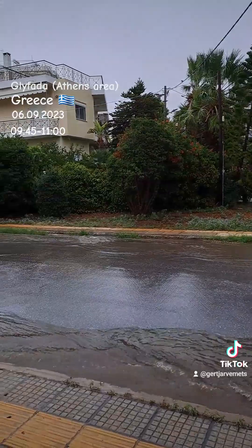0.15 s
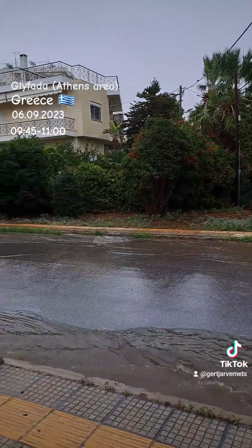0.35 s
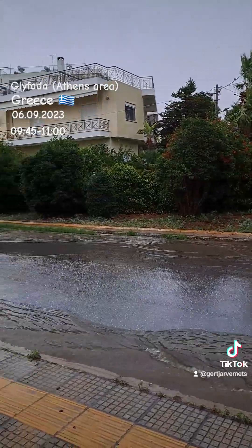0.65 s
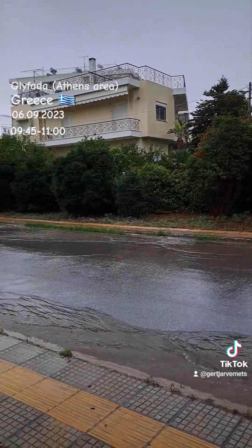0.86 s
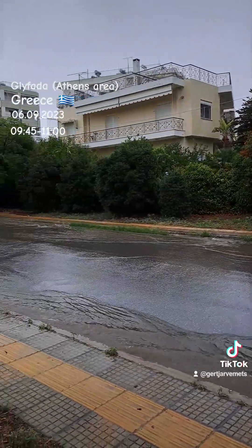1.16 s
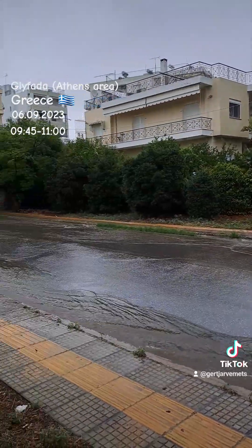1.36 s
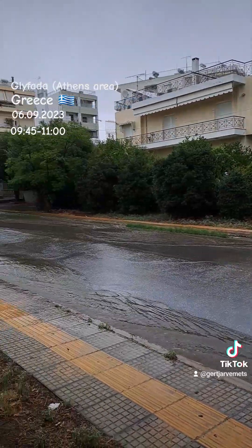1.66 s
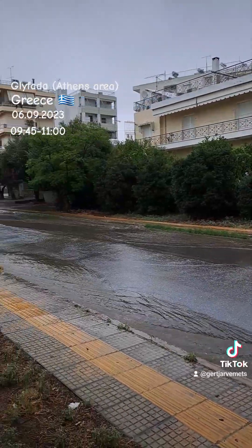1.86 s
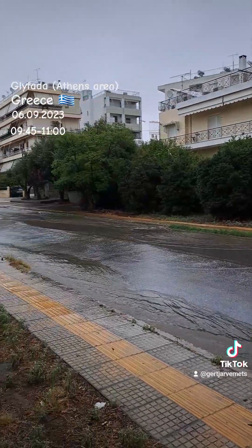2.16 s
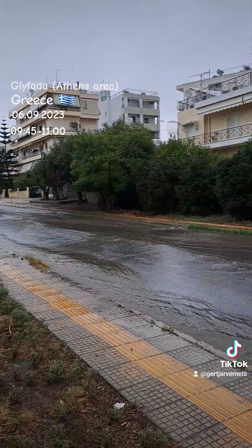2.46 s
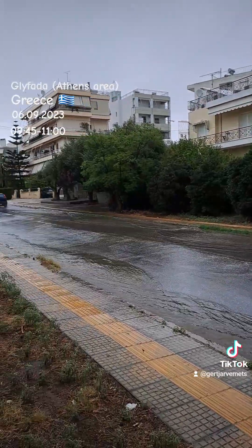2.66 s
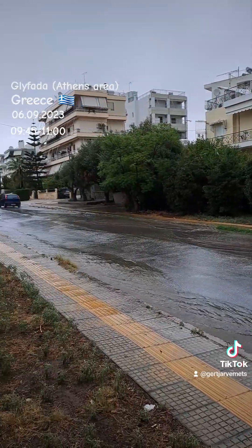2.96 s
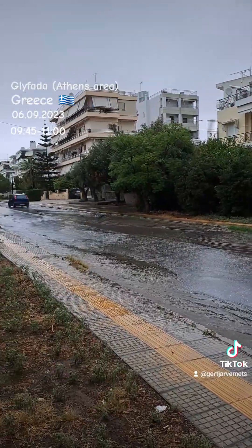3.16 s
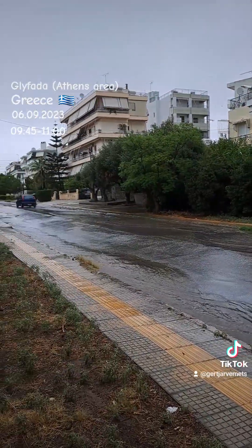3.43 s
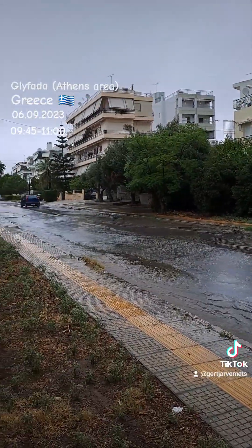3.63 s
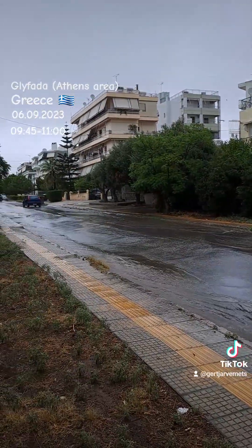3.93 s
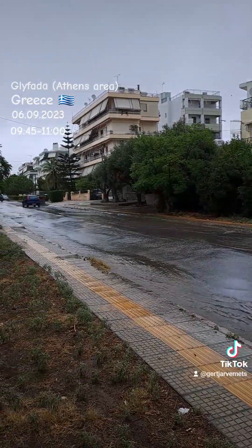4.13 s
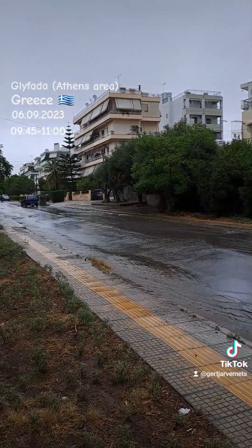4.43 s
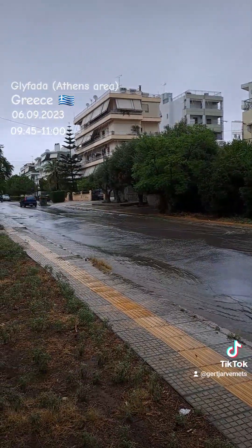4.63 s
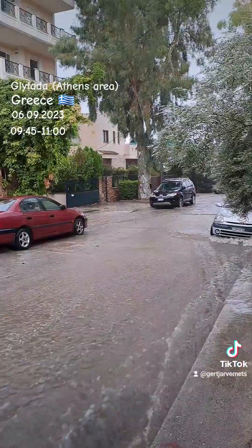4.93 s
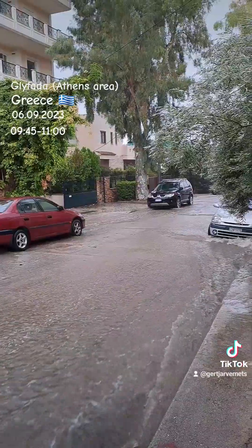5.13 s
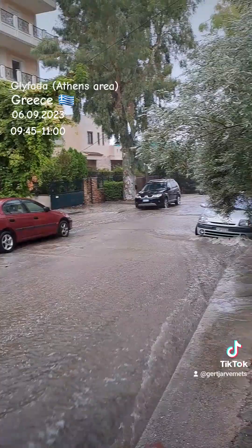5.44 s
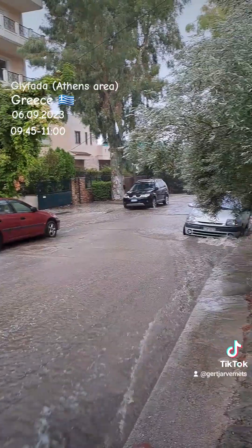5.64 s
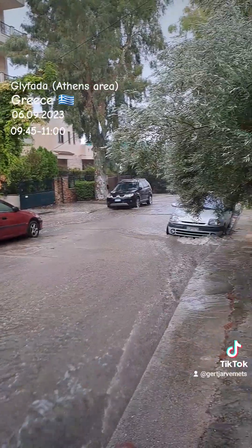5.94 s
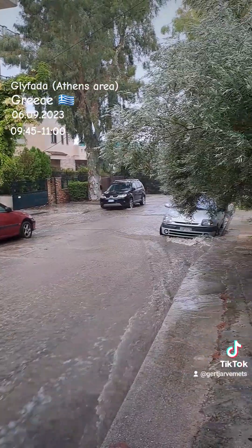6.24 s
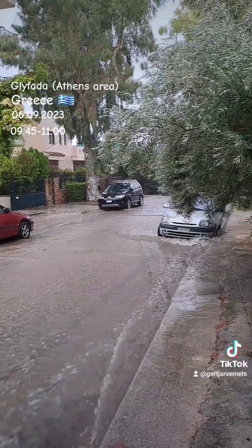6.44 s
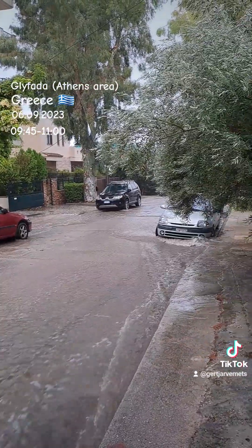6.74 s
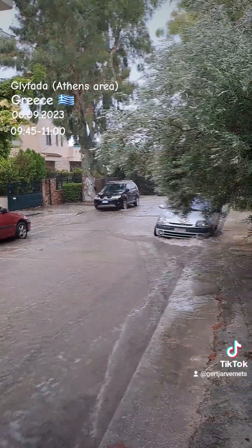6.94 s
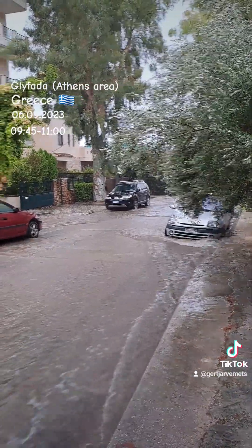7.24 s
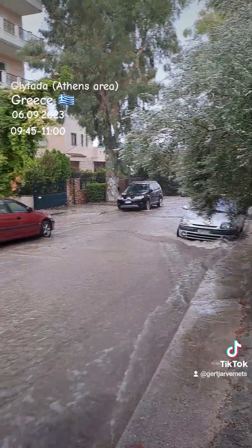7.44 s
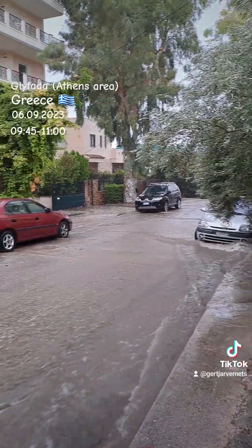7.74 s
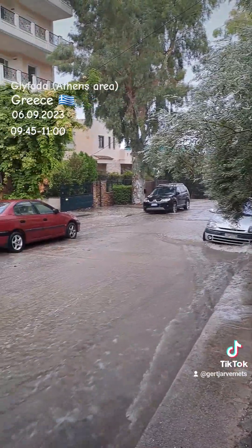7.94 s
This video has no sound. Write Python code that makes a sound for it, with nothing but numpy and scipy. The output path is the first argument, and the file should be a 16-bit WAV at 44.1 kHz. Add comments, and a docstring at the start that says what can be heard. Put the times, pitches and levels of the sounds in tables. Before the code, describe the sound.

A muffled, ringing rush of street water softens slightly as the phone turns away, with small gurgles and deep traffic rumble below. After a tiny gap, a second street bursts in: near floodwater churning with spray, glugs and plips, crisp drops hitting the right side of the microphone, and a car's low hum and exhaust booms barely carrying through the water.

```python
"""Two rainy streets, one cut: storm runoff heard through a hand-held phone with rain in its microphone ports.
On the road, bubbles and noise make a sheet of water; wet-port filters leave it hollow left, nasal right.
In the lane, a close torrent adds bright spray, large bubbles and slops, while a car's low sines idle and boom.
Raindrops ring the right port or plink in the water; rumble sits under both streets, far traffic on the road."""
import sys
import numpy as np
from scipy import signal
from scipy.fft import rfft, irfft, next_fast_len
from scipy.io import wavfile
from scipy.ndimage import uniform_filter1d, map_coordinates

SR = 44100
rng = np.random.default_rng(int(sys.argv[2]) if len(sys.argv) > 2 else 0)


def put_to_file(sound):
    """Save the sound as 16-bit audio at rate SR, in the file named by the first command-line argument."""
    columns = np.atleast_2d(sound).T  # one column per channel
    safe = np.clip(columns, -1, 1)
    whole_steps = np.round(safe * 32767)
    wavfile.write(sys.argv[1], SR, whole_steps.astype(np.int16))


N = 356769
TIME = np.arange(N) / SR
SIZE = next_fast_len(N, real=True)
FREQ = np.maximum(np.arange(SIZE // 2 + 1) * SR / SIZE, 1)

ROAD_END_S, LANE_START_S = 4.912, 4.937
SOAK_S = 4.221  # a drop settles in the right port
CUTOFF_HZ = 15600
LANE_RUMBLE_DB = -33.5
SLOP_ATTACK_SHARE = 0.6  # attack spread as a share of the fade spread
FIRING_HZ, FIRING_DB, FIRING_FADE_DB_PER_S = 45.8, -34, 3  # level at the start of the lane
DRONE_HZ, DRONE_DB, DRONE_FADE_DB_PER_S = 197.4, -40, 2  # level at the start of the lane
IDLE_END_S, IDLE_RELEASE_S = 6.6, 0.15
HUM_RISE_PER_S = 0.05  # exponential pitch rise, share per second
PATTER_PER_S, PATTER_DB, PATTER_SPREAD_DB, PATTER_HZ = 34, -19, 3.3, 12700  # level of the softest
SPLATTER_DB, SPLATTER_S = -18, 0.0005  # level against the hit

# Every "spread" below is the standard deviation of a bell-shaped rise and fall, in time or octaves.
# Spectrum levels are relative: trims and level curves follow.

# Colour of the rush through the left port: (frequency [Hz], level per Hz [dB])
LEFT_PORT_COLOUR = [(170.0, -60.5), (260.0, -59.3), (340, -60), (470.0, -63.8), (850.0, -54.6),
                    (960.0, -50.8), (1085.0, -45.4), (1220.0, -51.2), (1380.0, -58.3), (2000.0, -72.5),
                    (3000.0, -85.4), (4000.0, -105.7), (6500.0, -121.0), (11000.0, -109.7),
                    (15000.0, -117.1)]
# Colour of the rush through the right port: (frequency [Hz], level per Hz [dB])
RIGHT_PORT_COLOUR = [(170.0, -63), (260.0, -57.5), (345, -60.5), (500.0, -64.5), (680.0, -64),
                     (800.0, -62.5), (1250.0, -63.5), (1550.0, -58), (2800.0, -61.5), (3600.0, -57),
                     (4400.0, -69.5), (6400.0, -88.5), (8500.0, -80.5), (10200.0, -77), (13500.0, -100),
                     (15000.0, -104)]
# Colour of the right port once a drop has settled in it: (frequency [Hz], level per Hz [dB])
SOAKED_PORT_COLOUR = [(170.0, -60.7), (480.0, -65.6), (1250.0, -66.2), (1500.0, -62.6), (2300.0, -66.9),
                      (3100.0, -71.8), (3600.0, -70.3), (4450.0, -69.5), (4830.0, -66.3), (5370.0, -80.5),
                      (6600.0, -89.2), (9700.0, -81.9), (11100.0, -73.7), (14000.0, -96.5)]
# Colour of the torrent: (frequency [Hz], left level per Hz [dB], right level per Hz [dB])
TORRENT_COLOUR = [(150.0, -58, -57), (198, -55.5, -55), (290, -55, -54.5), (453, -56, -58.5),
                  (700.0, -53.5, -54.5), (1100.0, -56.5, -57), (1580, -56.5, -55), (2930, -61.5, -62.5),
                  (5760, -63, -64), (7270, -73, -72), (10060, -74.5, -70.5), (12030, -74, -60),
                  (14900, -82, -63.5), (15600.0, -88, -71)]
# How alike the ports hear the road: (frequency [Hz], likeness [0-1], lead of the left [rad])
ROAD_PORT_LIKENESS = [(50.0, 0.97, -0.5), (250.0, 0.99, -0.1), (480.0, 0.83, -0.0), (720.0, 0.9, -0.2),
                      (980.0, 0.69, -0.5), (1200.0, 0.53, -1.9), (1420.0, 0.53, -2.9), (1900.0, 0.45, -1.8),
                      (3000.0, 0.39, -1.8), (4000.0, 0.07, -0.5)]
# How alike the ports hear the lane: (frequency [Hz], likeness [0-1], lead of the left [rad])
LANE_PORT_LIKENESS = [(50.0, 0.98, -0.4), (130.0, 0.88, -0.2), (250.0, 0.96, -0.1), (450.0, 0.68, -0.4),
                      (750.0, 0.65, -0.8), (1050.0, 0.18, -1.1), (1700.0, 0.21, 1.3), (2450.0, 0.31, 0.1),
                      (3100.0, 0.02, -3.1)]
# Level of the runoff as the phone turns up the road, before shading: (time [s], level [dB])
FACING_LEVEL = [(0, 2), (1.9, 1), (2.8, -2), (4.9, -3.5)]
# Lift or dip of the nearest ripples' hiss band: (time [s], level [dB])
RIPPLE_HISS_LEVEL = [(0, 4.5), (2.2, -1), (3.6, 1.5), (4.3, 1.5)]
# Close reflection, sliding later overall as the phone turns: (time [s], delay [ms], strength [share])
CLOSE_ECHO = [(0, 1.1, 0.18), (.5, 1.08, 0.24), (1.15, 1.2, 0.18), (2.2, 1.33, 0.16), (3.4, 1.33, 0.1),
              (4.9, 1.5, .15)]
# Gurgles in the wet ports, as lifts or dips of a band:
# (time [s], spread [s], centre [Hz], spread [octaves], left change [dB], right change [dB])
PORT_GURGLES = [(.27, .1, 910, 0.15, 3, 5), (0.787, 0.096, 1020, 0.12, 2.5, 5),
                (0.817, 0.025, 3380, .15, 0, 3), (1.29, 0.027, 1100, .12, 3, 4),
                (1.45, 0.045, 1080, .15, -5.5, 0), (1.7, 0.12, 1110, 0.098, 2.5, 2),
                (1.805, 0.22, 3300, 0.082, 0, 1), (2.19, 0.18, 1080, 0.11, 2.5, 3),
                (2.16, 0.11, 1560, .08, 5, 3), (2.792, .05, 1080, .15, -4, -1),
                (3.01, 0.06, 1190, 0.09, 4.5, 0), (3.26, 0.12, 1060, 0.061, 3.5, 2),
                (3.53, 0.019, 3500, .2, 0, 3), (3.75, 0.016, 1080, 0.22, -6, 0),
                (4.05, .13, 3300, 0.2, 0, -1.5)]
# Slow surges and a lull of the torrent: (time [s], spread [s], body change [dB], spray change [dB])
TORRENT_SURGES = [(5.7, 0.19, 1, 0), (6.24, 0.14, -1, -0.9), (7.35, 0.29, 0.5, 0), (7.85, 0.092, 0, 0.5)]
# Water that slops over and splashes:
# (time [s], fade spread [s], centre [Hz], spread [octaves], level [dB], left over right [dB])
SLOP_EVENTS = [(5.122, .012, 620, 0.6, -22, 6), (5.15, .012, 330, .4, -26, -2),
               (5.35, .008, 5600, 0.22, -30, 0), (5.633, 0.0087, 700, .3, -24, 0),
               (5.665, .01, 300, 0.25, -32, 0), (5.746, 0.0091, 328, 0.43, -26.5, -2),
               (6.455, 0.009, 5700, .2, -29, -3), (6.47, .014, 290, .5, -30, 0),
               (6.72, .008, 250, .3, -30, 0), (7.22, .01, 500, 0.16, -30, 0),
               (7.278, 0.012, 755, 0.17, -26, -6), (7.28, .02, 3000, .9, -27.5, 0),
               (7.285, 0.018, 280, .45, -29, 2), (7.495, 0.013, 420, .3, -26.5, 0),
               (7.663, .007, 850, .6, -26, 0), (7.71, .012, 290, 0.52, -27, 0),
               (7.84, .01, 5100, .25, -31, -5), (7.915, .012, 1900, .7, -28, 0),
               (7.935, 0.013, 720, 0.33, -25, -2)]
# The heaviest raindrops on the right port: (time [s], hit level [dB], ring [Hz])
HEAVY_DROPS = [(1.485, -6.5, 11000), (2.3825, -28, 10600), (4.2213, -24.5, 11100), (5.2643, -7.5, 13260),
               (5.3838, -5, 12200), (5.6185, -7.5, 12600), (5.7071, -1.5, 12400), (5.8157, -3.5, 14300),
               (5.8563, -6.5, 13700), (5.9912, -6, 14300), (6.0835, 1.5, 13500), (6.1766, -3.5, 13900),
               (6.6124, -6, 11700), (6.8802, -5.5, 12600), (7.0371, -4.5, 14400), (7.4533, -7.5, 12200),
               (7.7904, -5.5, 13400)]
# Drops that plink in the water:
# (time [s], level [dB], pitch at the start [Hz], cycles to fade 60 dB, left over right [dB])
PLINK_EVENTS = [(2.5268, -44, 5850, 110, -24), (6.334, -22, 1300, 90, -9), (6.395, -17, 3850, 42, 6)]
# Exhaust booms as the car pulls through the water: (time [s], spread [s], pitch [Hz], level [dB])
EXHAUST_BOOMS = [(5.6, .14, 65.5, -32), (5.67, 0.064, 91.4, -36), (6.55, 0.11, 64, -32),
                 (6.9, .12, 84, -34), (7.28, 0.26, 68.3, -31), (7.75, 0.2, 79.1, -38), (7.8, .1, 64.5, -33)]
# Colour of the road's rumble: (frequency [Hz], level per Hz [dB])
ROAD_RUMBLE_COLOUR = [(20, -30), (27, -22), (34, -12), (42, -4.5), (50, -1), (65, -4.5), (85, -5),
                      (105, -3.5), (135, -9), (175, -15)]
# Level of the road's rumble, before shading by the port balance: (time [s], level [dB])
ROAD_RUMBLE_LEVEL = [(0, -33.5), (1.6, -32), (2.1, -34), (3.2, -32), (3.7, -33.5), (4.9, -35)]
# Colour of the lane's rumble: (frequency [Hz], level per Hz [dB])
LANE_RUMBLE_COLOUR = [(20, -30), (27, -19), (35, -7), (45, -8.5), (54, -6), (68, -2.5), (85, -4.5),
                      (115, -12), (135, -10), (175, -17.5)]
# Engines far up the road: (time [s], spread [s], pitch at that time [Hz], level [dB])
FAR_ENGINES = [(0.447, .4, 246, -42), (0.747, 0.24, 317.4, -41.5), (1.048, 0.34, 198, -43.5),
               (1.0, .3, 91.9, -40), (2.32, 0.077, 62.4, -35), (2.047, 0.17, 139.7, -44),
               (2.552, 0.27, 160, -42.5), (2.677, 0.073, 54, -33), (3.2, 0.22, 115.1, -41),
               (4.098, .15, 50, -38), (4.701, .2, 123.5, -41.5)]


def road(left_db, left_shelter, soaked_db, bass_shade, treble_shade, hiss_hz):
    """A sheet of runoff, heard through ports that ring with the water in them."""
    facing_db, = in_time(FACING_LEVEL)
    hiss_db, = in_time(RIPPLE_HISS_LEVEL)
    rumble_db, = in_time(ROAD_RUMBLE_LEVEL)
    water = running_water(grain_share=0.16, flutter_db=0.1, per_s=2100)
    left, right = at_ports(water, ROAD_PORT_LIKENESS)

    right = reflected(right, dull_hz=4630)
    hiss = colour(right, bell(hiss_hz, octaves=0.19))
    right = right + hiss * (from_db(hiss_db) - 1)

    left = splashing(left, [1000, 1090, 1170], per_s=9, fade_s=0.035, depth=0.55, octaves=0.035)
    right = splashing(right, [2200, 3100, 3700], per_s=20, fade_s=0.009, depth=0.6, octaves=0.12)

    left = colour(left, from_db(left_db + in_frequency(LEFT_PORT_COLOUR)[0]))
    left = left * from_db(-left_shelter * facing_db)  # the turn matters less on this side
    left = gurgled(left, port=0)
    right = gurgled(right, port=1)
    damp = colour(right, from_db(in_frequency(RIGHT_PORT_COLOUR)[0]))
    soaked = colour(right, from_db(in_frequency(SOAKED_PORT_COLOUR)[0]))
    right = np.where(TIME < SOAK_S, damp, from_db(soaked_db) * soaked)

    rush = colour(np.array([left, right]), above(102))
    # turning away from the water shades the short waves more than the long ones
    treble = colour(rush, above(940))
    bass = rush - treble
    rush = bass * from_db(bass_shade * facing_db) + treble * from_db(treble_shade * facing_db)

    low = rumble(ROAD_RUMBLE_COLOUR, rumble_db, ROAD_PORT_LIKENESS, pan_db=1.0)
    tyres = far_tyres(s=3.76, spread_s=0.44, hz=463, octaves=0.55, level_db=-41)
    return rush + low + far_traffic() + tyres


def torrent(body_db, spray_db):
    """Deep floodwater close by: a churning body and a spray that follow slow surges and a lull."""
    for s, spread_s, body_change_db, spray_change_db in TORRENT_SURGES:
        surge = hump(s, spread_s)
        body_db = body_db + body_change_db * surge
        spray_db = spray_db + spray_change_db * surge
    water = at_ports(running_water(grain_share=0.24, flutter_db=0.4, per_s=2800), LANE_PORT_LIKENESS)
    water = colour(water, from_db(in_frequency(TORRENT_COLOUR)) * above(155))
    centres_hz = [520, 780, 1150, 1650, 2400]
    water = splashing(water, centres_hz, per_s=16, fade_s=0.01, depth=0.7, octaves=0.19)
    spray = colour(water, above(2300, order=4))
    body = water - spray
    flow = body * from_db(body_db) + spray * from_db(spray_db)
    return flow + rumble(LANE_RUMBLE_COLOUR, LANE_RUMBLE_DB, LANE_PORT_LIKENESS, pan_db=1.5)


def running_water(grain_share, flutter_db, per_s):
    """Near bubbles over the smooth noise wash of far ones, fluttering in level; one stream for each port."""
    share = np.clip(grain_share, 0, 1)
    near = np.array([bubbles(per_s, cycles=14.0, spread_db=1.7, rise=0.078) for port in range(2)])
    far = rng.standard_normal((2, N))
    water = np.sqrt(share) * near + np.sqrt(1 - share) * far
    # the first factor brings the noise to unit power per Hz
    return np.sqrt(SR / 2) * water * from_db(flutter_db * drift(rate=17))


def bubbles(per_s, cycles, spread_db, rise, size=320):
    """Countless small bubbles, each a dying sine that rises in pitch and is taller the higher it starts."""
    when, place, luck, sign = rng.random((int(per_s * N / SR), 4)).T[..., None]
    hz = 500 * 32 ** place
    size_db = spread_db * np.minimum(-np.log(1 - luck), 4)
    height = hz * from_db(size_db) * np.sign(sign - 0.5)
    rings = height * bubble_ring(hz, np.arange(size) / SR, cycles, rise)
    at = (when * N).astype(int) + np.arange(size)
    return rms_one(np.bincount(at.ravel(), rings.ravel(), N + size)[:N])


def bubble_ring(hz, age, cycles, rise):
    """One bubble: a sine that climbs in pitch and fades by 60 dB over the given cycles."""
    spent = age * hz / cycles
    return from_db(-60 * spent) * np.sin(2 * np.pi * hz * age * (1 + rise * spent))


def splashing(x, centres_hz, per_s, fade_s, depth, octaves):
    """Random small splashes lift one band or another at once and die away; each gain has unit mean power."""
    spectrum, out = rfft(x, SIZE), x
    for hz in centres_hz:
        starts = (rng.random(N) < per_s / SR) * rng.uniform(0.38, 1, N)
        fading = signal.lfilter([1], [1, -np.exp(-1 / (fade_s * SR))], starts + 1e-18)
        lift = rms_one(1 + depth * fading)
        band = irfft(spectrum * bell(hz, octaves), SIZE)[..., :N]
        out = out + (lift - 1) * band
    return out


def gurgled(x, port):
    """Water shifts in a port: each gurgle briefly lifts or dips one narrow band of the rush."""
    spectrum, out = rfft(x, SIZE), x
    for s, spread_s, hz, octaves, *change_db in PORT_GURGLES:
        band = irfft(spectrum * bell(hz, octaves), SIZE)[:N]
        out = out + (from_db(change_db[port]) - 1) * hump(s, spread_s) * band
    return out


def reflected(x, dull_hz):
    """A short, dull echo adds comb ripples that slide as its delay changes with the turning phone."""
    delay_ms, strength = in_time(CLOSE_ECHO)
    late = map_coordinates(x, [np.arange(N) - delay_ms * SR / 1000], order=3)
    dull = colour(late, 1 - above(dull_hz))
    return (x + strength * dull) / np.sqrt(1 + strength ** 2)


def at_ports(streams, pair):
    """Long waves reach both ports nearly alike; short ones differ, by a likeness and phase per frequency."""
    likeness, lead = in_frequency(pair)
    likeness = np.clip(likeness, 0, 1)
    left, other = streams
    shared = colour(left, likeness * np.exp(-1j * lead))
    own = colour(other, np.sqrt(1 - likeness ** 2))
    return np.array([left, shared + own])


def slops():
    """A wave folds over and frees a cloud of bubbles of like size: band noise, quick to rise, slower to die."""
    out = np.zeros((2, N))
    churn = rfft(at_ports(rng.standard_normal((2, N)), LANE_PORT_LIKENESS), SIZE)
    for s, fade_s, hz, octaves, db, pan_db in SLOP_EVENTS:
        shape = hump(s, fade_s * np.where(TIME < s, SLOP_ATTACK_SHARE, 1))
        cloud = irfft(churn * bell(hz, octaves), SIZE)[:, :N] * shape
        out += rms_one(cloud) * np.sqrt(np.mean(shape ** 2)) * panned(db, pan_db)
    return out


def glugs(per_s, level_db, low_hz, high_hz, cycles, spread_db, rise, size=2400):
    """Single bubbles stand out of the torrent at random, each a dying sine that rises in pitch."""
    when, place, luck, side = rng.random((int(per_s * N / SR), 4)).T[..., None]
    hz = low_hz * (high_hz / low_hz) ** place
    height = from_db(level_db - spread_db * luck)
    rings = height * bubble_ring(hz, np.arange(size) / SR, cycles, rise)
    at = ((when * N).astype(int) + np.arange(size)).ravel()
    sides = [rings * (1 + way * (side - 0.5)) for way in (1, -1)]
    return np.array([np.bincount(at, x.ravel(), N + size)[:N] for x in sides])


def raindrops(ring_t60, cavity_hz, cavity_db, leak_db, splatter_db, splatter_s):
    """Each drop hits and splatters; it pings the right port and, more weakly, the cavity behind it."""
    out, age = np.zeros(N), TIME[:SR // 20]
    for s, db, hz in HEAVY_DROPS:
        splatter = from_db(splatter_db) * rng.standard_normal(len(age)) * np.exp(-age / splatter_s)
        hit = from_db(db) * ((age == 0) + splatter)
        port = ring(hit, hz, ring_t60)
        cavity = from_db(cavity_db) * ring(hit, cavity_hz, ring_t60)
        at = round(s * SR)
        out[at:at + len(age)] += port + cavity
    return out * from_db([[leak_db], [0]])


def drizzle(per_s, level_db, spread_db, port_hz):
    """Fine droplets prickle at random on the right port, each a click that rings it."""
    sizes = from_db(level_db + spread_db * np.minimum(rng.exponential(1, N), 3))
    clicks = sizes * (rng.random(N) < per_s / SR)
    return ring(clicks, port_hz, t60=0.0012) * np.array([[0], [1]])


def ring(clicks, hz, t60):
    """A two-pole resonator: a unit click sets a sine of starting height 1 ringing."""
    r, w = from_db(-60 / (t60 * SR)), 2 * np.pi * hz / SR
    return signal.lfilter([0, np.sin(w)], [1, -2 * r * np.cos(w), r * r], clicks + 1e-18)


def plinks(tick_db, tick_s, rise):
    """A drop meets the water with a thin noise tick while the bubble that it traps rings and rises."""
    out, age = np.zeros((2, N)), TIME[:SR // 8]
    for s, db, hz, cycles, pan_db in PLINK_EVENTS:
        bubble = bubble_ring(hz, age, cycles, rise)
        tick = from_db(tick_db) * rng.standard_normal(len(age)) * np.exp(-age / tick_s)
        at = round(s * SR)
        out[:, at:at + len(age)] += (bubble + tick) * panned(db, pan_db)
    return out


def car():
    """Only the lowest engine tones carry over the water: a fading idle and a boom at each pull."""
    elapsed = np.maximum(TIME - LANE_START_S, 0)
    firing = engine_tone(FIRING_HZ, FIRING_DB - FIRING_FADE_DB_PER_S * elapsed, waver=0.012)
    drone = engine_tone(DRONE_HZ, DRONE_DB - DRONE_FADE_DB_PER_S * elapsed, waver=0.0028)
    # the idle sinks under the water as the car moves off
    idling = 0.5 - 0.5 * np.tanh((TIME - IDLE_END_S) / IDLE_RELEASE_S)
    booms = sum(engine_tone(hz, db, waver=0.012) * hump(s, spread_s)
                for s, spread_s, hz, db in EXHAUST_BOOMS)
    return (firing + drone) * idling + booms


def engine_tone(hz, level_db, waver):
    """One engine order: a sine whose pitch wavers slightly."""
    turns = np.cumsum(hz * (1 + waver * drift(rate=5.1))) / SR
    return np.sqrt(2) * from_db(level_db) * np.sin(2 * np.pi * turns)


def rumble(spectrum, level_db, pair, pan_db):
    """Traffic and churning water: deep noise evened out in level, nearly the same at both ports."""
    gain = from_db(in_frequency(spectrum)) * above(18) * (1 - above(187))
    low = at_ports(colour(rng.standard_normal((2, N)), gain), pair)
    swell = np.sqrt(uniform_filter1d(np.mean(low ** 2, axis=0), size=SR // 9))
    return from_db(level_db) * low / swell * panned(0, pan_db)


def far_traffic():
    """Faint, unsteady engine tones come and go up the road, rising as the cars gather speed."""
    hums = 0
    for s, spread_s, hz, db in FAR_ENGINES:
        rising_hz = hz * np.exp(HUM_RISE_PER_S * (TIME - s))
        hums = hums + engine_tone(rising_hz, db, waver=0.0091) * hump(s, spread_s)
    return hums


def far_tyres(s, spread_s, hz, octaves, level_db):
    """A distant car's tyres: a dull wash of band noise that swells and fades."""
    wash = colour(at_ports(rng.standard_normal((2, N)), ROAD_PORT_LIKENESS), bell(hz, octaves))
    return from_db(level_db) * rms_one(wash) * hump(s, spread_s)


def from_db(db):
    """Decibels to gain."""
    return 10 ** (np.asarray(db) / 20)


def panned(db, pan_db):
    """Left and right gains around a level, set apart by the left-over-right balance."""
    return from_db([[db + pan_db / 2], [db - pan_db / 2]])


def rms_one(x):
    """Scale to unit power."""
    return x / np.sqrt(np.mean(x ** 2) + 1e-20)


def in_time(rows):
    """Each column of a curve table at every sample."""
    s, *columns = np.transpose(rows)
    return [np.interp(TIME, s, c) for c in columns]


def in_frequency(rows):
    """Each column of a spectrum table at every frequency, joined along log frequency."""
    hz, *columns = np.transpose(rows)
    return np.array([np.interp(np.log(FREQ), np.log(hz), c) for c in columns])


def colour(x, gain):
    """Filter by a gain per frequency."""
    return irfft(rfft(x, SIZE) * gain, SIZE)[..., :N]


def above(hz, order=8):
    """Gain of a smooth high-pass; one minus it is the matching low-pass."""
    return 1 / (1 + (hz / FREQ) ** order)


def bell(hz, octaves):
    """Gain of a rounded band."""
    return np.exp(-0.5 * (np.log2(FREQ / hz) / octaves) ** 2)


def hump(s, spread_s):
    """A smooth rise and fall of height 1 around a moment."""
    return np.exp(-0.5 * ((TIME - s) / spread_s) ** 2)


def drift(rate):
    """Slow random wander with unit power, low-passed around a rate in Hz."""
    return rms_one(colour(rng.standard_normal(N), 1 / (1 + (FREQ / rate) ** 2)))


def scene():
    """The road, a moment of silence at the cut, then the lane."""
    road_fade = np.clip((ROAD_END_S - TIME) / 0.002, 0, 1)
    lane_fade = np.clip((TIME - LANE_START_S) / 0.012, 0, 1)
    street = road(left_db=-1.17, left_shelter=0.12, soaked_db=2.5,
                  bass_shade=0.41, treble_shade=0.89, hiss_hz=5400)
    lane = torrent(body_db=0.0, spray_db=-0.16) + car() * from_db([[1.1], [-1.1]])
    lane = lane + glugs(per_s=45, level_db=-21.5, low_hz=650, high_hz=3200,
                        cycles=22, spread_db=9, rise=0.15)
    # rain striking the flood nearby: short, bright plips
    lane = lane + glugs(per_s=22, level_db=-20.5, low_hz=1800, high_hz=6000,
                        cycles=16, spread_db=9, rise=0.1)
    lane = lane + drizzle(PATTER_PER_S, PATTER_DB, PATTER_SPREAD_DB, PATTER_HZ)
    drops = raindrops(ring_t60=0.0025, cavity_hz=4800, cavity_db=-12, leak_db=-46,
                      splatter_db=SPLATTER_DB, splatter_s=SPLATTER_S)
    streets = road_fade * street + lane_fade * lane
    return streets + slops() + drops + plinks(tick_db=-5, tick_s=0.001, rise=0.04)


def record(dry):
    """The tallest peaks overload, and the top is cut steeply."""
    clipped = np.clip(dry, -0.9, 0.9)
    return colour(clipped, 1 / (1 + (FREQ / CUTOFF_HZ) ** 400))


dry = scene()
out = record(dry)
put_to_file(out)
```